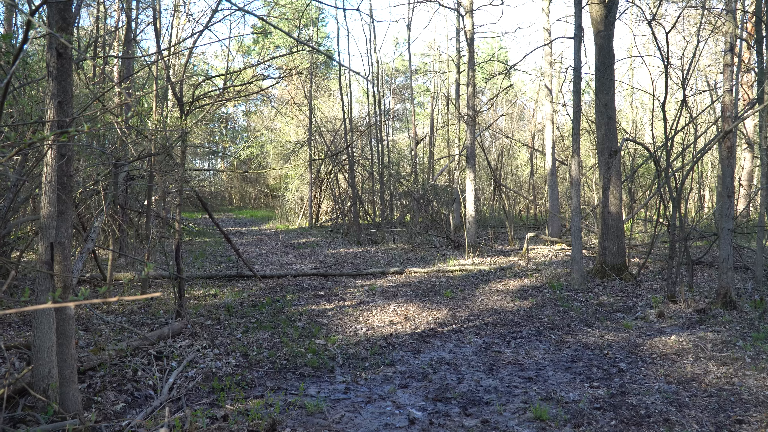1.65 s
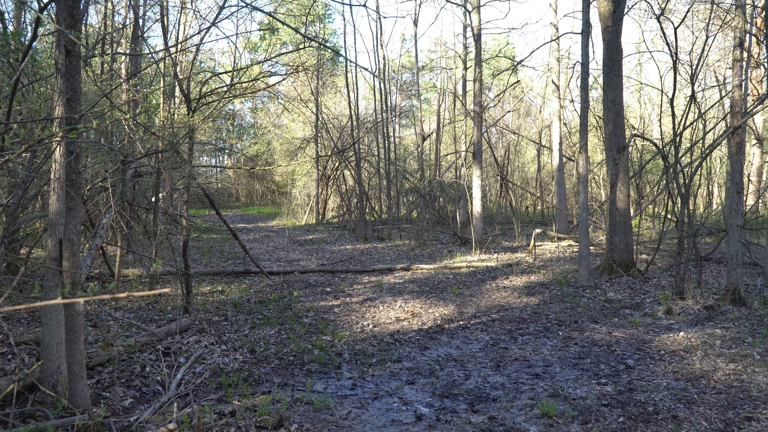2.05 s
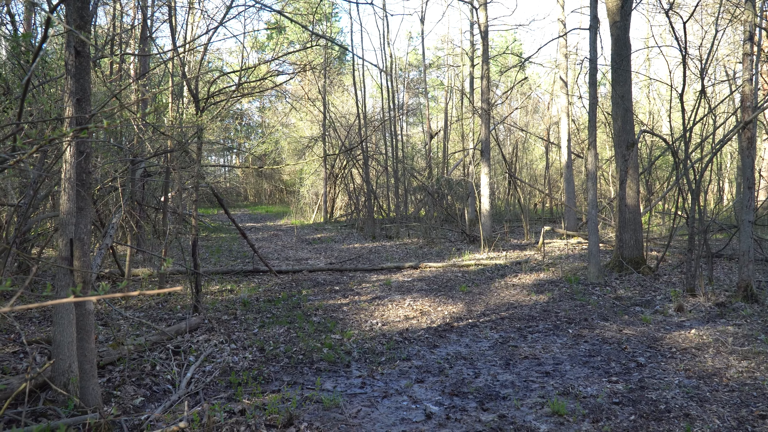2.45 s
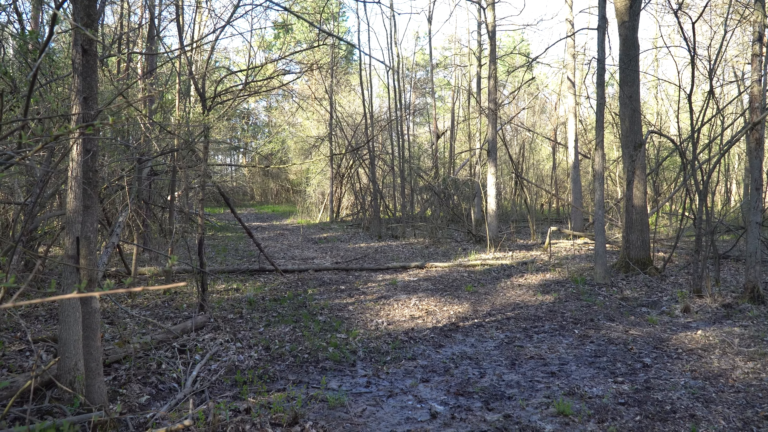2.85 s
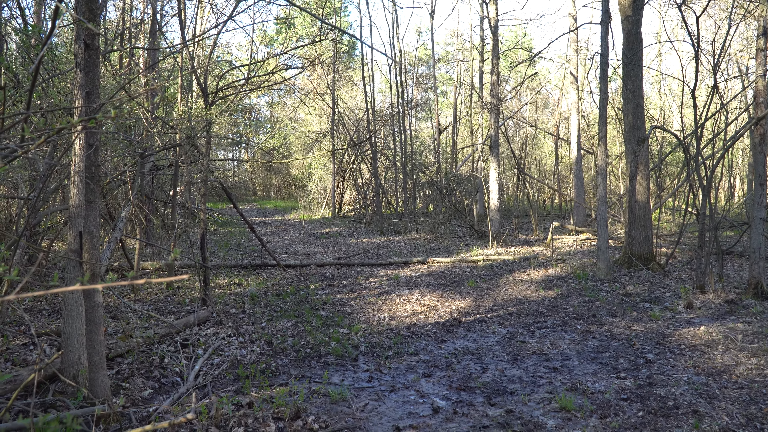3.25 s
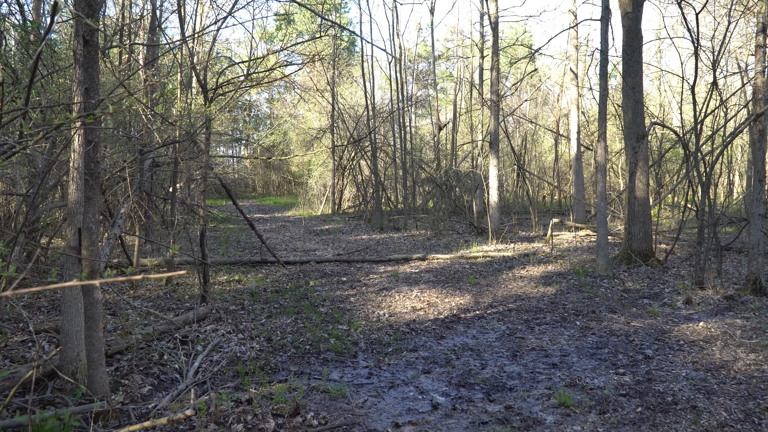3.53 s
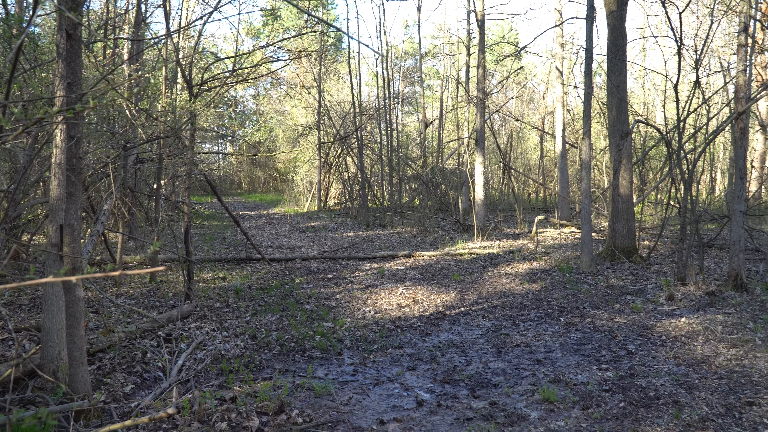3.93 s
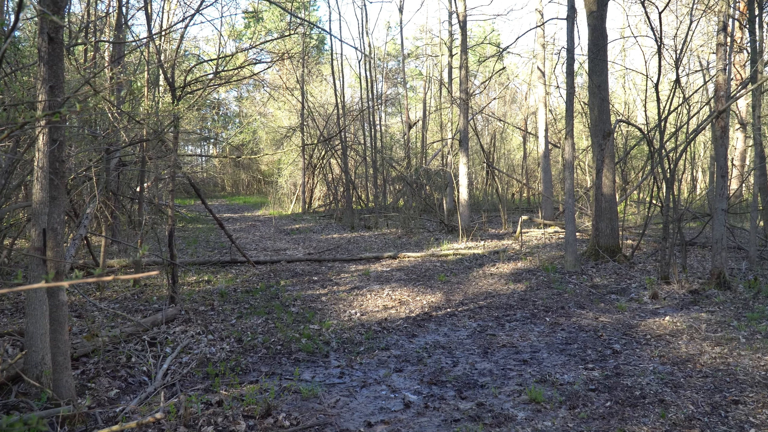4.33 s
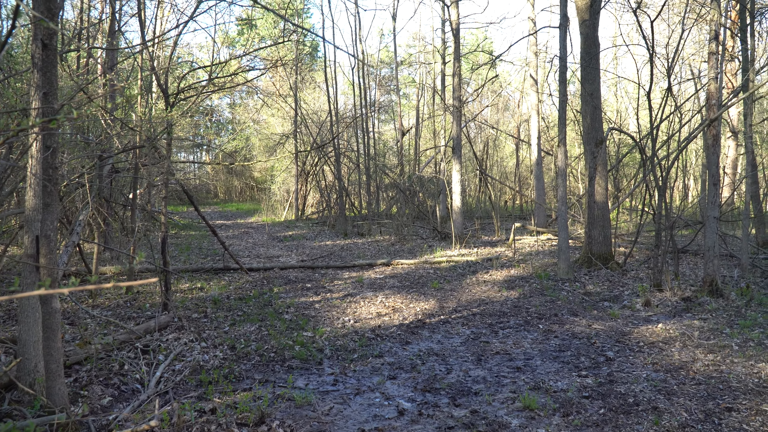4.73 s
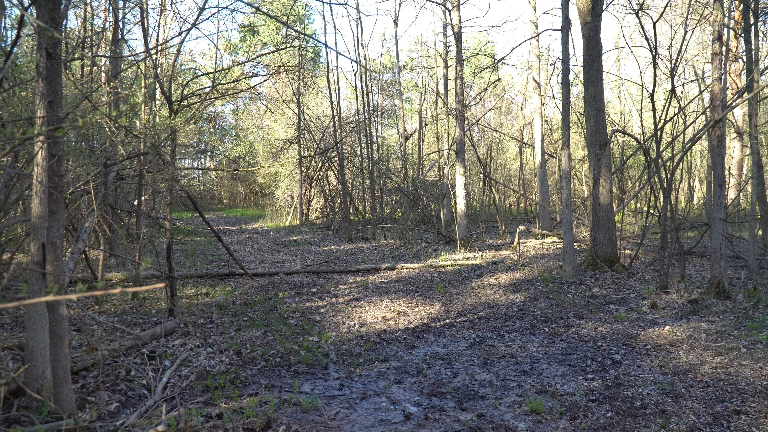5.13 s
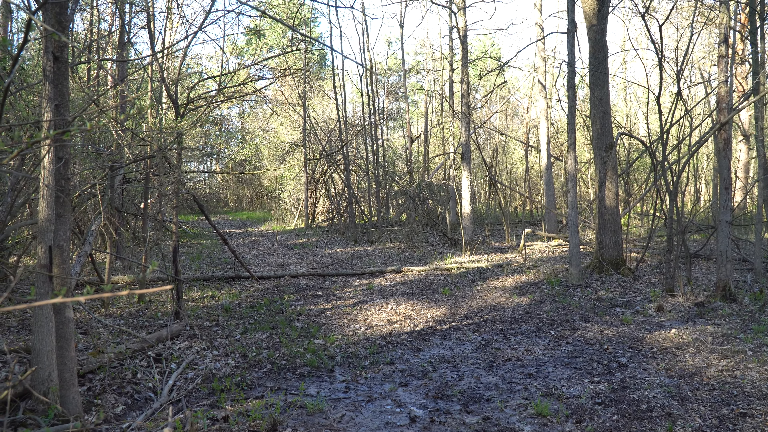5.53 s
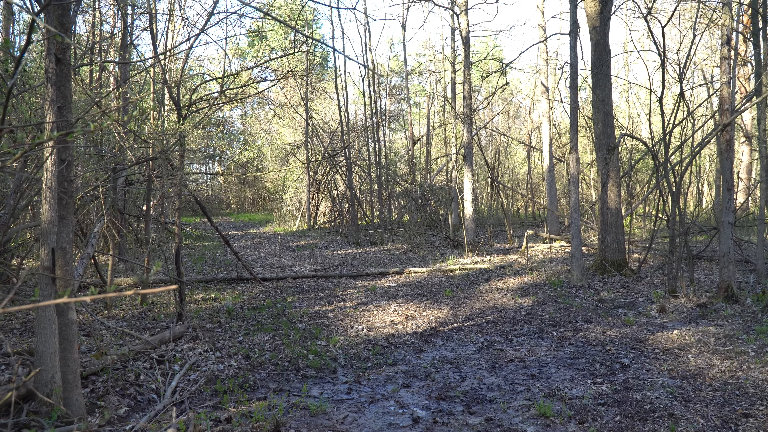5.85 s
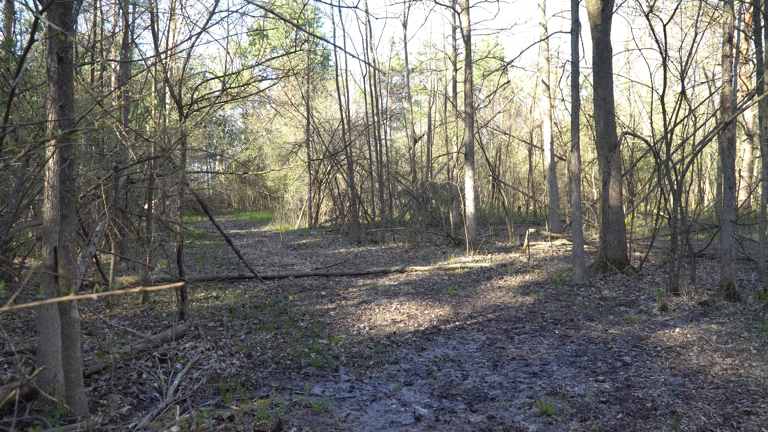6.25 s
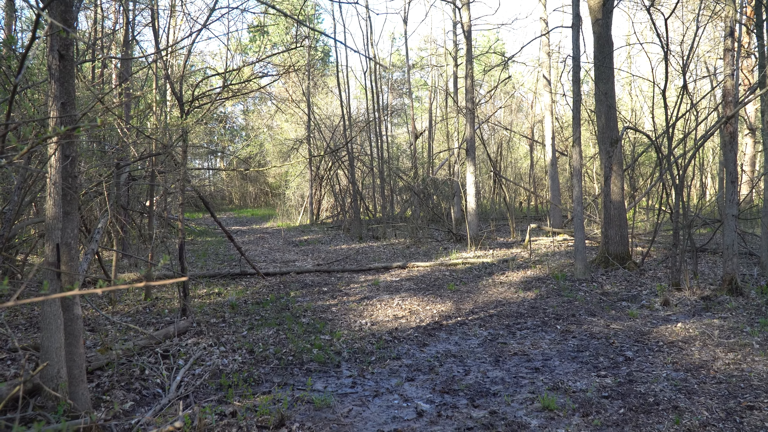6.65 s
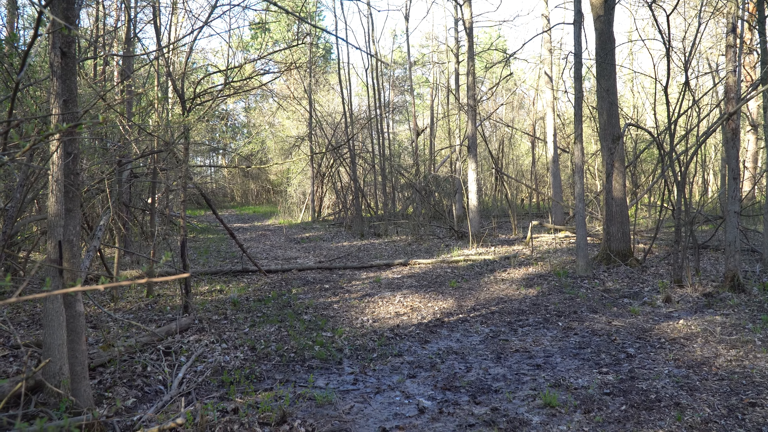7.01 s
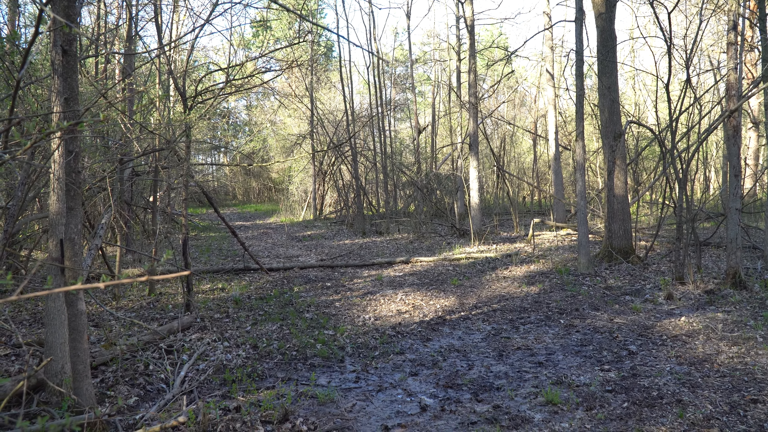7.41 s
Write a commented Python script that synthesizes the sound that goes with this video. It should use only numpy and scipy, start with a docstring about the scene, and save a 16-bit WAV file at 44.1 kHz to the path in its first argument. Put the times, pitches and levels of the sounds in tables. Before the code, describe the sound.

A wooden box call close to the microphone in open woodland: a short hard cluck at the start, a pause of over two seconds, then ten quick, hoarse, woody yelps about a third of a second apart, each dropping in pitch. Trees return a diffuse echo. Low wind rumbles, dry leaves tick, a drone lies far off and a faint bird whistles after the run.

```python
"""The dying echo of a cluck in low wind rumble, then a cluck and ten yelps from a wooden box call near the microphone.
The chalked lid sticks and slips on the thin wall; each slip rings the box, slowing and often pairing up late in a stroke.
Tree trunks around the open woodland scatter the notes; dry leaves tick, and a drone and two whistling birds lie far off.
At the very end the background cuts to a louder, windier stretch: a decaying step, low wind swing and louder noise."""
import sys
import numpy as np
from scipy import signal
from scipy.fft import rfft, irfft, next_fast_len
from scipy.io import wavfile
from scipy.ndimage import uniform_filter1d

SR = 44100
rng = np.random.default_rng(int(sys.argv[2]) if len(sys.argv) > 2 else 0)


def waveform_to_disk(signal):
    """Save audio, clipped to [-1, 1], as 16-bit WAV at the path in sys.argv[1]."""
    frames = np.transpose(np.atleast_2d(signal))
    scaled = np.clip(frames, -1, 1) * 32767
    samples = np.round(scaled).astype(np.int16)
    wavfile.write(sys.argv[1], SR, samples)


N = 347508

# Strokes of the lid; the slip rate drifts to a knee, then sags to its lowest and stays there:
# start_s, length_s, first_hz, knee_s, knee_hz, low_s, low_hz (times within the stroke), level_db (relative),
# swell_s, swell_db, droop_db, early_pairing_0to1, late_pairing_0to1, roughness_0to1, chalk_bite_db,
# sing_db (wall singing at twice the slip rate)
STROKES = [ (.216, 0.048, 966, 0.012, 945, 0.024, 924.4, -20, 0.0035, 1, 8.5, 0.64, 0.4, .14, 1, -5.5),
           (2.939, 0.084, 791.7, 0.037, 771, 0.072, 637, -19.5, 0.017, 3, 5, 0.59, .1, 0.08, 1, -30.5),
           (3.223, 0.08, 791.5, 0.031, 794, 0.066, 601, -20, .004, 1, 2, 0.11, 0.5, 0.08, 5, -27.5),
           (3.513, 0.075, 849, .036, 788, 0.062, 623.3, -17.5, 0.0097, 6.5, 3, 0.36, 0.67, 0.2, 2, -31),
           (3.815, 0.065, 854, 0.026, 791.6, 0.039, 633.4, -18.5, 0.011, 3, 0, 0.02, 0.8, 0.2, 3, -33.5),
           (4.107, 0.077, 843, 0.019, 836, 0.052, 628, -18, .004, 7, 1.5, 0.22, 0.93, .08, 2, -35.5),
           (4.413, .094, 842, 0.026, 786, 0.074, 625, -16.5, 0.018, 7, 8, 0.1, 1, 0.13, 1, -44),
           (4.755, 0.089, 787, .018, 792.6, .078, 617, -17.5, 0.0087, 5.5, 10.5, 0, 0.95, .12, 3, -34),
           (5.153, 0.12, 836.4, 0.085, 768, 0.11, 583.6, -23, 0.07, 6, -1, 0.03, .1, 0.15, -1, -59),
           (5.572, 0.094, 799, 0.043, 765.5, 0.083, 602.6, -19.5, 0.028, 15, 1, 0.2, 0.43, .08, 0, -39.5),
           (5.962, 0.079, 785, 0.029, 789.7, 0.063, 598.4, -20.5, 0.023, 6.5, 1, 0, 0.85, 0.05, 2.5, -34), ]
# Touches or knocks of the lid on the wall as some strokes start: start_s, impulse_db (relative), bite_db
TOUCHES = [(0.2182, -11, 1.5), (4.1, -25, -13), (4.1082, -13.5, -7), (4.404, -31, -14), (5.554, -34, -22)]
# Modes of the wooden box: centre_hz, width_hz (before the damping limit), level_db (relative)
BOX_MODES = [(840, 240, -7), (1017, 164, 2.5), (1198.5, 99, 4), (1524, 318, 0.5), (1931.5, 101, -4.5),
             (2040, 290, -16.5), (2630, 380, -8), (3186, 230, -14.5), (3510, 680, -25), (4810, 150, -15),
             (5500, 170, -17), (5960, 1700, -32), (7180, 183, -17.5), (8510, 1200, -28.5),
             (9100, 1086, -46), (11680, 1480, -39), (13100, 330, -42.5), (14470, 770, -65)]
# Echo from the trunks: centre_hz, t60_s, level_db
TRUNK_ECHO = [(670, 0.53, -48), (1327, 1, -13), (1980, 0.99, -15.5), (3200, 0.56, -8), (5040, 0.4, -16.5),
              (9070, 0.12, -19.5), (15000, .2, -28)]
# Loudest dry leaves and twigs: start_s, peak_db, centre_hz
LEAF_TICKS = [(0.5185, -31, 516), (.519, -44, 3450), (0.586, -43.5, 8700), (.7064, -33, 6560),
              (1.075, -52, 6950), (1.248, -47, 4000), (2.054, -48, 6500), (2.661, -47, 8500),
              (3.13, -51, 6000), (3.42, -49, 6130), (3.989, -46, 7800), (4.914, -46, 11200),
              (5.877, -56, 5500), (6.3025, -44.5, 6660), (6.6516, -47, 7540), (7.19, -58, 2000),
              (7.33, -54, 2700), (7.7674, -50, 3400), (7.83, -43, 7000)]
# Far birds: start_s, length_s, pitch_hz, level_db (before the swell)
WHISTLES = [(6.185, 0.89, 2770, -66.5), (7.476, 0.18, 3690, -70.5)]
# Wind on the microphone: time_s, level_db
WIND_LEVEL = [(0.0, -38), (0.11, -24), (0.28, -28.5), (0.69, -20), (1.78, -27), (2.36, -19), (2.47, -31.5),
              (2.9, -18.5), (3.12, -32), (3.16, -21), (3.9, -30), (4.03, -22.5), (5.0, -33.5),
              (5.89, -28.5), (7.0, -26), (7.28, -19), (7.32, -30.5), (7.78, -21)]
# Colour of the wind rumble: frequency_hz, density_db (per Hz, relative)
WIND_COLOUR = [(6, -8), (10, 0), (18, 2), (24, -3), (30, -12), (38, -28)]
# Level of the air: time_s, drone_db, hiss_db
AIR_LEVEL = [(0, -42, -66), (.7, -42, -66), (1.5, -42.5, -67), (2.799, -42, -66.5), (4, -45, -67.5),
             (5.2, -49, -75), (6, -47.5, -70.5), (7, -47.5, -71.5), (7.78, -45.5, -71)]
# Colour of the distant drone: frequency_hz, density_db (per Hz, relative)
DRONE_COLOUR = [(22, -39), (38, -8.5), (46, -10.5), (49, -14), (130, -16), (252, -26.5), (443, -21.5),
                (749, -28.5), (1060, -31), (1540, -39.5), (1980, -41), (2320, -49.5), (4000, -63),
                (5200, -93.5), (8800, -120)]
# Colour of the treble hiss: frequency_hz, density_db (per Hz, relative)
HISS_COLOUR = [(1500, -27), (2500, 2.5), (5000, -4.5), (9000, -9), (16000, -12.5)]
# Colour of the louder background at the end: frequency_hz, density_db (per Hz, relative)
LOUDER_COLOUR = [(35, -33), (60, -6), (91, -12), (346, -22), (749, -19), (1170, -32), (1340, -28),
                 (1910, -38.5), (16000, -66)]

LEAD = SR // 2  # samples of call worked out before the start, so that its echo carries over
# a cluck like the first, this long before it; only its last ring and echo are left
EARLIER_CLUCK_S, EARLIER_CLUCK_DB = 0.27, -12.5

# The hand
WOBBLE, STUMBLE = .006, .06  # uneven drag: relative drift of the slip rate, and what full roughness adds
SURGE_DB, SURGE_RATE = 2, 150  # unsteady pressure (dB, per s)
BREAK_S, BREAK_ROUGH, BREAK_DB = .004, .2, 2.5  # at the knee the lid stumbles: rougher and weaker for a moment
RELEASE_S, RELEASE_DB = 0.014, 11.5  # the hand lets go at the end of the stroke
RELEASE_BITE_DB = 11  # the treble fades first as it does
LIFT_S = .008  # the lid lifts off the wall over this time

# Chalk and slips
CHALK_DB = -12  # scrape released with every slip (relative)
GRIP_DB, GRIP_RATE = 4.5, 130  # contact wandering over the chalk drives upper modes unevenly (dB, per s)
SCATTER_DB, SHIFT = 10, .6  # at full roughness: spread of slip size (dB) and of slip time (periods)
START_ROUGH, SAG_ROUGH, SETTLE_S = .1, .1, .015  # extra roughness as the lid settles and as the rate sags
SOFT_START_DB, SOFT_END_DB = 14, 11.5  # less bite while the lid settles and once the slips pair up
EARLY_PAIRING_S = 0.0288  # slips that start out in pairs have evened out after this long
PAIRING_FROM = 0.66  # slips pair up when the sag has gone this far

# Box and trunks
RING_S = .06  # time left for the box to ring after the last slip
WOOD_Q = 13  # wood damps its modes: none is sharper than this
TRUNK_ONSET_S, TRUNK_LUMP_DB = 0.01, 1.5  # build-up; single trunks and clearings make the echo lumpy
NEAR_T60_S, NEAR_DB = 0.26, -11.5  # ground and undergrowth close by return a short, bright wash

# Fainter ticks fall at random: lowest peak, range above it, lowest centre, range above it
FAINT_TICKS = 10
FAINT_DB, FAINT_SPREAD_DB, FAINT_HZ, FAINT_OCTAVES = -60, 6, 3000, 2

# The cut to the louder, windier stretch
CUT_S, CUT_STEP, STEP_SETTLE_S = 7.7905, 0.27, 0.0063
SWING_HZ, SWING_DB, LOUDER_DB = 19.3, -12.5, -30.5  # swing level is relative, before its swell

TOP_HZ = 15800  # the recorder passes nothing much above this


def box_call():
    """All strokes and touches of the lid, from LEAD samples before the start; thin walls radiate little bass."""
    out = np.zeros(N + LEAD)
    first_s, *cluck, cluck_sing_db = STROKES[0]
    earlier = undb(EARLIER_CLUCK_DB) * slips(cluck, cluck_sing_db)
    sounds = [(first_s - EARLIER_CLUCK_S, earlier)]
    sounds += [(start_s, slips(stroke, sing_db)) for start_s, *stroke, sing_db in STROKES]
    sounds += [(start_s, box(undb([db]), [bite_db])) for start_s, db, bite_db in TOUCHES]
    for start_s, sound in sounds:
        i = LEAD + int(start_s * SR)
        out[i:i + len(sound)] += sound
    # little is radiated below the lowest mode
    radiation = signal.butter(4, 560, "high", fs=SR, output="sos")
    return undb(28.5) * signal.sosfilt(radiation, out)


def slips(stroke, sing_db):
    """One stroke: a pulse per slip, uneven in time and size, with a puff of chalk noise, sounded by the box."""
    t, hz, db, pairing, rough, bite_db = stroke_controls(*stroke)
    hz = hz * (1 + (WOBBLE + STUMBLE * rough) * walk(200, size=len(t)))
    size_chance, time_chance, chalk_noise = rng.standard_normal((len(t), 3)).T
    phase = np.cumsum(hz) / SR
    at = np.flatnonzero(np.diff(np.floor(phase), prepend=-1))
    # every second slip is weaker
    size = 1 + pairing[at] * (-1.) ** np.arange(len(at))
    size = size * undb(SCATTER_DB * rough[at] * size_chance[at])
    # roughness shifts each slip by a part of its period
    shift = SHIFT * rough[at] ** 2 * time_chance[at]
    place = at - (phase[at] % 1 - shift) * SR / hz[at]
    # sinc pulses can fall between samples
    pulses = (size * np.sinc(np.arange(len(t))[:, None] - place)).sum(axis=1)
    puff = np.exp(-(phase % 1) / 0.29)
    chalk = undb(CHALK_DB) * (0.046 + rough) * puff * chalk_noise
    singing = np.cos(4 * np.pi * phase) + 0.46 * np.cos(8 * np.pi * phase)
    singing = undb(sing_db) * (1 - pairing) * singing
    lift = np.clip((t[-1] - t) / LIFT_S, 0, 1)
    return box((pulses + chalk + singing) * undb(db) * lift, bite_db)


def stroke_controls(length_s, first_hz, knee_s, knee_hz, low_s, low_hz, db, swell_s, swell_db, droop_db,
                    early_pairing, late_pairing, rough, bite_db):
    """Slip rate, level, pairing, roughness and bite as the hand drags the lid through one stroke."""
    t = np.arange(0, length_s, 1 / SR)
    ramp = lambda x: np.clip(x, 0, 1)
    hz = np.interp(t, [0, knee_s, low_s], [first_hz, knee_hz, low_hz])
    sag = ramp((t - knee_s) / (low_s - knee_s))
    settling = np.exp(-t / SETTLE_S)
    stumble = np.exp(-((t - knee_s) / BREAK_S) ** 2)
    release = ramp(1 - (length_s - t) / RELEASE_S)

    db = db - swell_db * np.sqrt(ramp(1 - t / swell_s)) - droop_db * t / length_s
    db = db - RELEASE_DB * release - BREAK_DB * stumble
    db = db + SURGE_DB * walk(SURGE_RATE, size=len(t))

    late = late_pairing * ramp((sag - PAIRING_FROM) / (1 - PAIRING_FROM))
    early = early_pairing * ramp(4 - 4 * t / EARLY_PAIRING_S)
    pairing = ramp(early + late)

    # the slide down is rough; once locked in pairs the slips steady again
    sag_rough = SAG_ROUGH * sag * (1 - late ** 2)
    rough = ramp(rough + START_ROUGH * settling + sag_rough + BREAK_ROUGH * stumble)
    bite_db = bite_db - SOFT_START_DB * settling - SOFT_END_DB * late ** 2 - RELEASE_BITE_DB * release
    return t, hz, db, pairing, rough, bite_db


def box(force, bite_db):
    """A force on the wall rings the modes; a harder bite of the chalk favours the upper ones."""
    silence = np.zeros(int(RING_S * SR))
    force, bite_db = np.append(force, silence), np.append(bite_db, silence)
    body = 0
    for hz, width_hz, db in BOX_MODES:
        width_hz = max(width_hz, hz / WOOD_Q)
        upper = np.clip(hz / 2000 - 1, 0, 1)  # none at 2 kHz, full from 4 kHz
        grip_db = GRIP_DB * walk(GRIP_RATE, size=len(force))
        drive = force * undb(db + upper * (bite_db + grip_db))
        body = body + ring(ring(drive, hz, width_hz), hz, 1.4 * width_hz)
    return body


def trunks(dry):
    """Scattered echo: decaying noise that builds up over the nearest trunks and mostly dies sooner in the treble."""
    t = np.arange(int(1.4 * SR)) / SR
    log_f = np.log(np.maximum(np.arange(len(t) // 2 + 1) * SR / len(t), 1))
    log_centres = np.log(np.array(TRUNK_ECHO)[:, 0])
    noise, tail = rfft(rng.standard_normal(len(t))), 0
    # each row of the identity gives one band, crossfading with its neighbours
    for share, (_, t60_s, db) in zip(np.eye(len(log_centres)), TRUNK_ECHO):
        band = irfft(noise * np.interp(log_f, log_centres, share), len(t))
        tail = tail + band * undb(db) * energy_fade(t, t60_s)
    tail = tail + rng.standard_normal(len(t)) * undb(NEAR_DB) * energy_fade(t, NEAR_T60_S)
    tail = tail * undb(TRUNK_LUMP_DB * walk(75.1, size=len(t)))
    onset = 1 - np.exp(-(t / TRUNK_ONSET_S) ** 2)
    return signal.fftconvolve(dry, tail * onset)[:len(dry)]


def ticks():
    """Dry leaves and twigs: short broad clicks of decaying noise, each with its own colour."""
    size = 512
    out, t = np.zeros(N + size), np.arange(size) / SR
    faint = [(a * N / SR, FAINT_DB + FAINT_SPREAD_DB * b, FAINT_HZ * 2 ** (FAINT_OCTAVES * c))
             for a, b, c in rng.random((FAINT_TICKS, 3))]
    for start_s, db, hz in LEAF_TICKS + faint:
        click = rng.standard_normal(size) * np.exp(-t / (0.00075 + 1.25 / hz))
        click = ring(ring(click, hz, hz / 2), hz, hz)
        i = int(start_s * SR)
        out[i:i + size] += undb(db) * click / abs(click).max()
    return out[:N]


def birds(t):
    """Thin whistles blurred by distance into narrow wavering bands of noise."""
    out = 0
    for start_s, length_s, hz, db in WHISTLES:
        swell = np.sin(np.pi * np.clip((t - start_s) / length_s, 0, 1) ** 0.51)
        whistle = ring(ring(rng.standard_normal(N), hz, 220), hz, 220)
        out = out + undb(db) * swell * unit(whistle)
    return out


def wind_rumble(t):
    """Wind buffeting the microphone: very low noise that rises and falls."""
    return coloured(WIND_COLOUR, 0.47, 1.3) * undb(np.interp(t, *np.transpose(WIND_LEVEL)))


def drone_and_hiss(t):
    """Distant drone and treble hiss: two coloured noises on slowly drifting levels."""
    time_s, drone_db, hiss_db = np.transpose(AIR_LEVEL)
    drone = coloured(DRONE_COLOUR, 0.7, 4.4) * undb(np.interp(t, time_s, drone_db))
    hiss = coloured(HISS_COLOUR, 1.5, 6.4) * undb(np.interp(t, time_s, hiss_db))
    return drone + hiss


def windier_stretch(t):
    """The louder, windier stretch: a decaying step at the splice, then low wind swing and louder noise."""
    since = np.maximum(t - CUT_S, 0)
    swell = np.sin(np.pi * SWING_HZ * since)
    swing = np.sin(2 * np.pi * SWING_HZ * (since - .012))
    wind = np.sqrt(2) * undb(SWING_DB) * swell * swing
    step = CUT_STEP * np.exp(-since / STEP_SETTLE_S)
    noise = coloured(LOUDER_COLOUR, 2.8, 29.8, size=LEAD) * undb(LOUDER_DB)
    return wind + step + np.append(np.zeros(N - LEAD), noise)


def air(t):
    """Rumble, drone and hiss, replaced by the windier stretch from the cut on."""
    return np.where(t >= CUT_S, windier_stretch(t), wind_rumble(t) + drone_and_hiss(t))


def undb(db):
    """Gain of a level in dB."""
    return 10 ** (np.asarray(db) / 20)


def unit(x):
    """Scaled to rms 1."""
    return x / np.sqrt(np.mean(x ** 2))


def energy_fade(t, t60_s):
    """Exponential decay by 60 dB in t60_s, scaled to energy 1."""
    fade = np.exp(-np.log(1000) * t / t60_s)
    return fade / np.sqrt(np.sum(fade ** 2))


def ring(x, hz, width_hz):
    """Two-pole resonance, gain 1 at the centre."""
    return signal.lfilter(*signal.iirpeak(hz, hz / width_hz, SR), x)


def walk(rate, size=N):
    """Random levels held 1 / rate s and slewed twice; spread near 1."""
    k = int(SR / rate)
    held = np.repeat(rng.standard_normal(size // k + 1), k)
    return 1.07 * uniform_filter1d(uniform_filter1d(held, k), k)[:size]


def coloured(spectrum, flicker_db, rate, size=N):
    """Noise of a given spectrum and rms 1, in half-octave bands that each flicker on their own."""
    hz, db = np.transpose(spectrum)
    n = next_fast_len(size)
    octave = np.log2(np.maximum(np.arange(n // 2 + 1) * SR / n, 1))
    shape = undb(np.interp(octave, np.log2(hz), db, left=-120))
    shaped = rfft(rng.standard_normal(n)) * shape
    out = 0
    for centre in np.arange(np.log2(hz[0]), np.log2(hz[-1]) + .5, .5):
        band = irfft(shaped * np.clip(1 - 2 * abs(octave - centre), 0, 1), n)[:size]
        out = out + band * undb(flicker_db * walk(rate, size=size))
    return unit(out)


def scene():
    """The close call with its echo, over the sounds of the wood."""
    t = np.arange(N) / SR
    call = box_call()
    echoed = (call + trunks(call))[LEAD:]
    return (echoed + ticks() + birds(t) + air(t))[None]


def record(dry):
    """The recorder cuts the top with a steep low-pass."""
    return signal.sosfilt(signal.ellip(8, .2, 70, TOP_HZ, fs=SR, output="sos"), dry)


dry = scene()
out = record(dry)
waveform_to_disk(out)
```